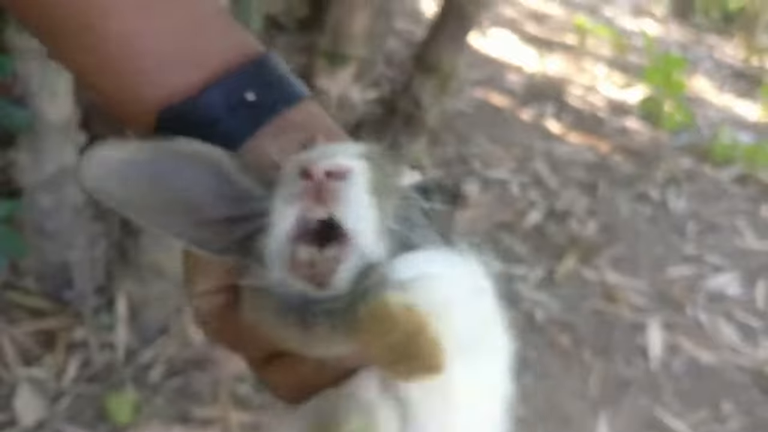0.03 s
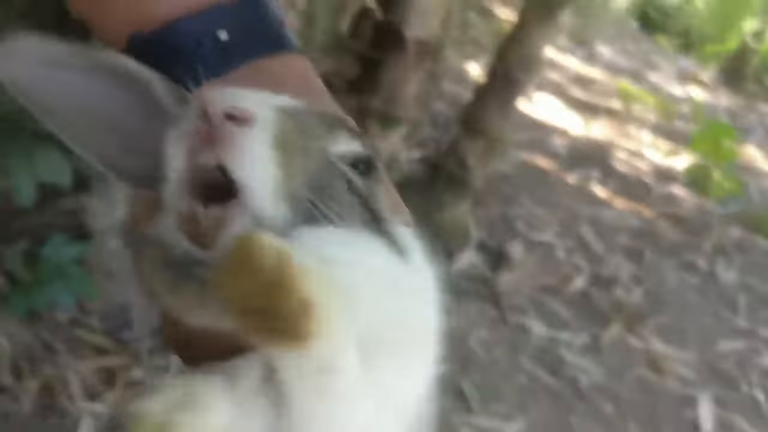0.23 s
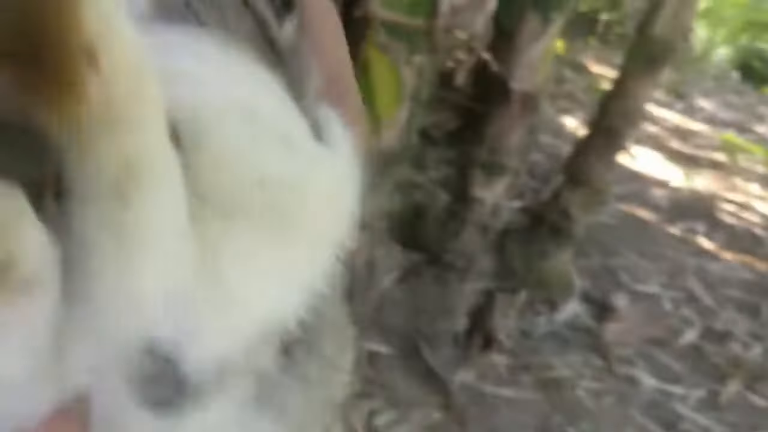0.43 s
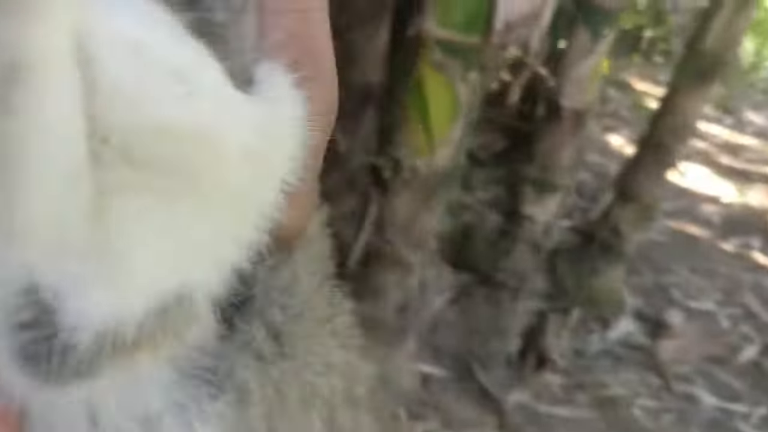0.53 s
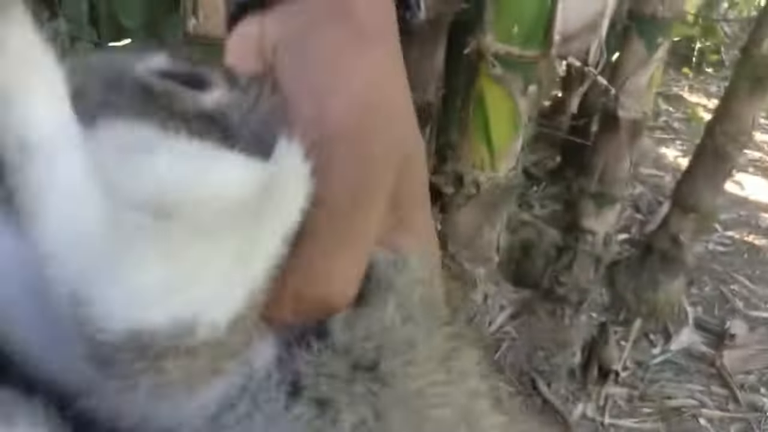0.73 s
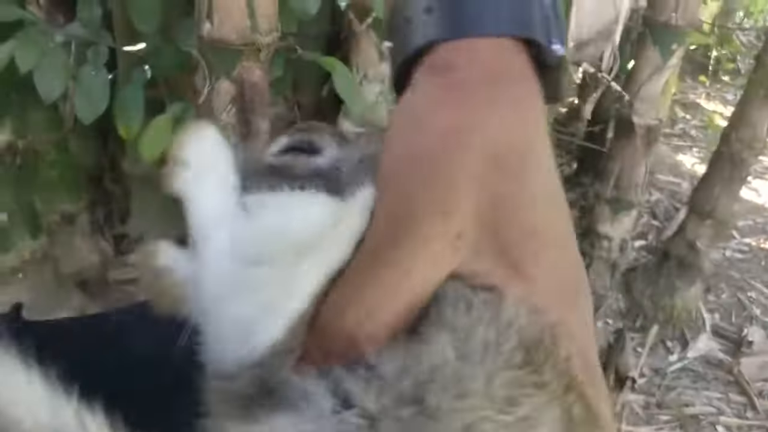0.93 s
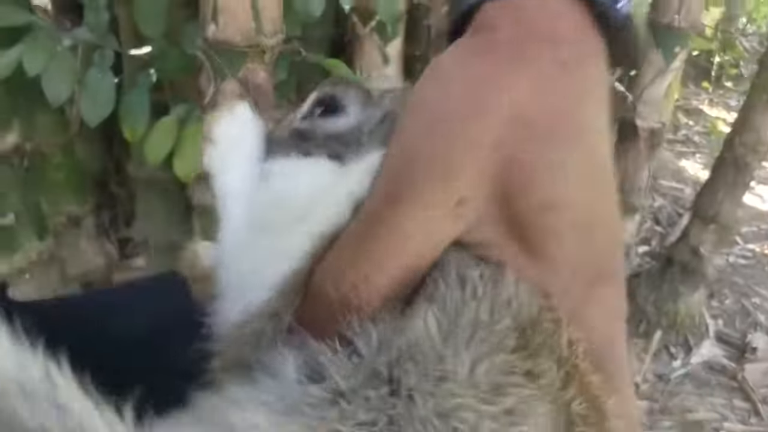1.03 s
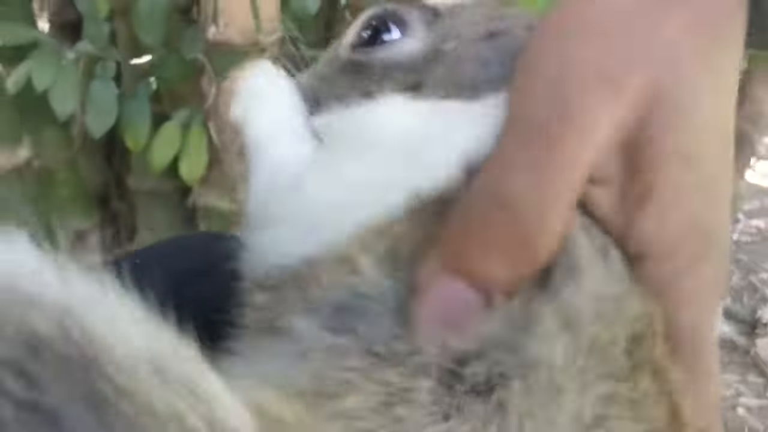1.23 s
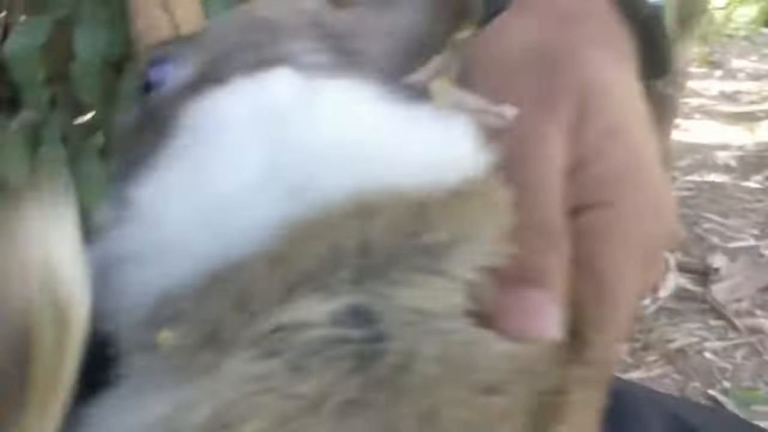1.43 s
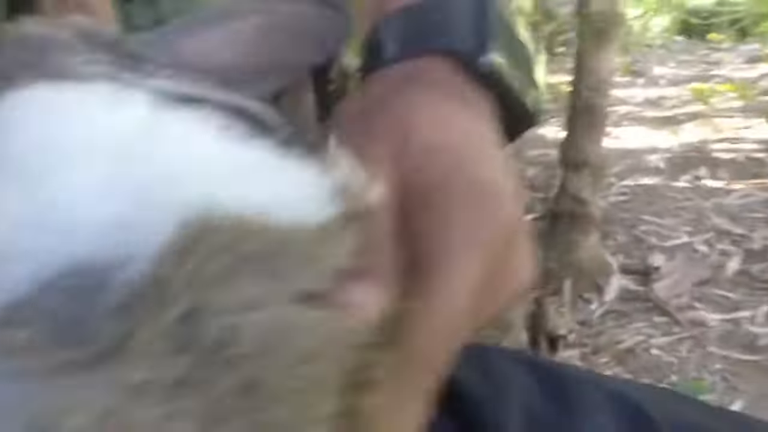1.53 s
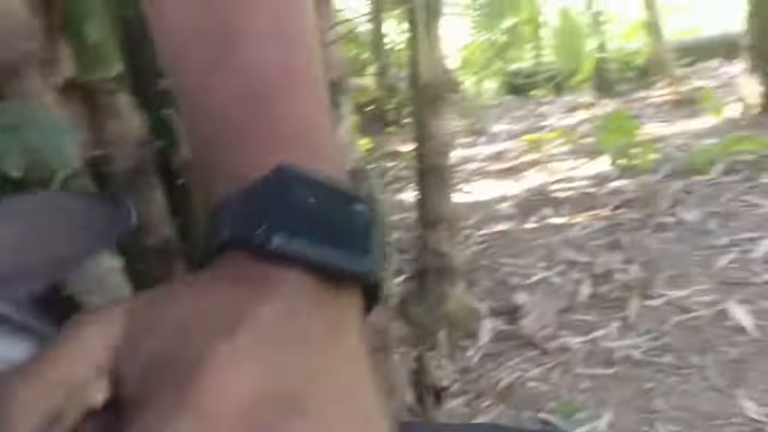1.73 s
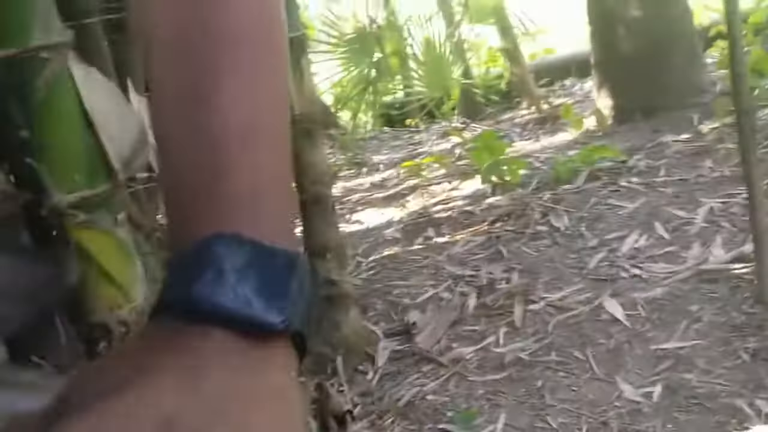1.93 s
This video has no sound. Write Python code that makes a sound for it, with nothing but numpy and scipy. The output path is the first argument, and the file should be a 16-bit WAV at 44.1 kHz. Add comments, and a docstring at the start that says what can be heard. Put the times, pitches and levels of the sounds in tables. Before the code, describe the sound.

A rabbit screams four times, harsh high squeals close up over a low outdoor rumble.

```python
"""Over a low outdoor rumble and small handling bumps, a young rabbit held close to a phone screams four times.
First its vocal folds give a rising squeal, and under strain a second, higher vibration breaks in.
The next cry creaks and shrieks at once, fluttering and chaotic, then fades into air rasping in the throat.
The third is a pressed squeal that gives way to the shriek; the last is only a short, creaking squeal.
After each cry the trees return a faint tail."""
import sys
import numpy as np
from scipy import signal
from scipy.fft import rfft, irfft
from scipy.io import wavfile
from scipy.ndimage import uniform_filter1d, minimum_filter1d, map_coordinates

SR = 44100
rng = np.random.default_rng(int(sys.argv[2]) if len(sys.argv) > 2 else 0)


def bounce(signal):
    """Save signal as a 16-bit WAV file at the path given by the first command-line argument."""
    frames = np.transpose(np.atleast_2d(signal))
    limited = np.clip(frames, -1, 1)
    pcm = np.round(limited * 32767).astype(np.int16)
    wavfile.write(sys.argv[1], SR, pcm)


N = 88200
TIME = np.arange(N) / SR


def undb(db):
    """Amplitude ratio of a level in decibels."""
    return 10 ** (np.asarray(db) / 20)


def unit(x):
    """Normalisation to rms 1."""
    return x / np.sqrt(np.mean(x ** 2))


def gains(spectrum):
    """Magnitude response, interpolated over log frequency."""
    hz, db = np.array(spectrum, float).T
    return undb(np.interp(np.log(np.arange(N // 2 + 1) * SR / N + 1), np.log(hz), db))


def colour(x, spectrum):
    """Zero-phase filtering by a product of spectra."""
    return irfft(rfft(x) * gains(spectrum), N)


def phase_of(hz):
    """Phase is the time integral of frequency."""
    return 2 * np.pi * np.cumsum(hz) / SR


def resonate(hz, width_hz):
    """A resonance driven by noise: a steep band whose centre may move."""
    skirt = signal.butter(4, width_hz / 2, fs=SR, output="sos")
    ring = signal.sosfilt(skirt, rng.standard_normal(N) + 1j * rng.standard_normal(N))
    return unit(np.real(ring * np.exp(1j * phase_of(hz * np.ones(N)))))


def wander(rate_hz):
    """Random modulation: low-pass noise of rms 1."""
    return unit(signal.sosfilt(signal.butter(2, rate_hz, fs=SR, output="sos"), rng.standard_normal(N)))


def controls(table, edge_s=0.00461):
    """Linear interpolation: a gate over the table's span, then each column as a curve."""
    times, *columns = np.array(table, float).T
    gate = np.clip(np.minimum(TIME - times[0], times[-1] - TIME) / edge_s + 1, 0, 1)
    return [gate] + [np.interp(TIME, times, column) for column in columns]


def delayed(x, ms):
    """Propagation delay, which may vary in time."""
    return map_coordinates(x, [np.arange(N) - ms * SR / 1000])


# spectrum of the ambient noise (frequency [Hz], gain [dB])
AMBIENT_SPECTRUM = [(25, -53), (45, -0.5), (87, -3), (300, -14), (750, -16.5), (2110, -22.5), (5430, -36.5),
                    (7920, -51), (16000, -37)]
# its envelope (time [s], level [dB])
AMBIENT_ENVELOPE = [(0, -41.5), (.4, -40.5), (.63, -45), (.9, -36.5), (1.2, -44)]
def rumble(side_db=-9):
    """Partly coherent ambient noise: one part in phase at both microphones, one in antiphase."""
    mid, side = (unit(colour(rng.standard_normal(N), AMBIENT_SPECTRUM)) for _ in range(2))
    _, db = controls(AMBIENT_ENVELOPE)
    return undb(db) * (mid + undb(side_db) * side * np.array([[1], [-1]]))


# bumps and rustles (time [s], centre frequency [Hz], level [dB], decay time [s])
HANDLING_BUMPS = [(0.31, 233, -35.5, 0.0038), (0.693, 94, -32.5, 0.018), (0.944, 83, -34, 0.02),
                  (1.265, 1855, -45, 0.0069)]
def handling():
    """Damped transients: each touch excites a noise band that swells and decays exponentially."""
    bumps = 0
    for start, hz, db, decay in HANDLING_BUMPS:
        age = np.maximum(TIME - start, 0) / decay
        bumps = bumps + undb(db) * age * np.exp(1 - age) * resonate(hz, width_hz=hz)
    return bumps


def reflections(x, db, t60_s):
    """Diffuse reflection: convolution with decaying noise, independent on each side."""
    t = TIME[:N // 4]
    response = rng.standard_normal((2, len(t))) * undb(-60 * t / t60_s) * (t > .001)
    response /= np.sqrt(np.sum(response ** 2, axis=1, keepdims=True))
    return undb(db) * signal.fftconvolve(x[None], response, axes=1)[:, :N]


def arm_echo(x, db=-7, delay_ms=1.121, sway_ms=0.31, sway_hz=3.7):
    """Reflection off the moving arm; added to the direct sound it forms a shifting comb filter."""
    sway = np.sin(2 * np.pi * (sway_hz * TIME + rng.random()))
    return undb(db) * delayed(x, delay_ms + sway_ms * sway)


# treble scattered by fur and hands (frequency [Hz], gain [dB])
FUR_SPECTRUM = [(2500, -24), (5000, -4), (12000, -4)]
# balance of the voice between the microphones (frequency [Hz], left minus right level [dB])
STEREO_BALANCE = [(500, 15.5), (1100, -15), (1650, -9.5), (1870, -21), (2200, 1), (2600, 4), (3400, -2),
                  (5500, 2), (7000, 14.5), (8500, 17.5), (14000, 15)]
def near_paths(voice, right_late_ms=0.327):
    """Interference of direct, reflected and scattered sound, which reaches the left microphone first."""
    near = np.array([x + arm_echo(x) for x in (voice, delayed(voice, right_late_ms))])
    near = near + reflections(colour(voice, FUR_SPECTRUM), db=2, t60_s=0.022)
    ratio = gains(STEREO_BALANCE)
    equal_power_pan = np.array([ratio, np.ones_like(ratio)]) * np.sqrt(2 / (1 + ratio ** 2))
    return irfft(rfft(near) * equal_power_pan, N)


def jaw(start, end, shut=.32, open_s=.04, sag=0.078, close_s=0.031, quiver=.028):
    """Formant scaling: resonances start low, rise as the quivering jaw opens and sink as it closes."""
    opening = shut * np.exp(-np.maximum(TIME - start, 0) / open_s)
    closing = sag * np.exp(-np.maximum(end - TIME, 0) / close_s)
    return 1 - opening - closing + quiver * wander(rate_hz=14)


# resonances of the throat (frequency [Hz], bandwidth [Hz], relative level [dB])
THROAT_FORMANTS = [(838, 670, -11.5), (1864, 525, -3), (2447, 170, -3.5), (3575, 1170, 1)]
# spectrum of the mouth's hiss (frequency [Hz], gain [dB])
HISS_SPECTRUM = [(200, -24.5), (900, -4), (4300, -1.5), (5350, 15), (6500, -4), (8600, -2), (10500, -10),
                 (12500, -3.5), (16000, -10.5)]
# airflow noise, one table per cry (time [s], relative rasp level [dB], relative hiss level [dB])
BREATHS = [
    [(.47, -39, -48), (.49, -22, -37.5), (.53, -42, -31.5), (.56, -26, -36), (.597, -21.5, -41)],
    [(.76, -23, -47), (.79, -31, -37), (.86, -23, -28), (.92, -15, -34), (.98, -18.5, -34),
     (1.06, -14, -38.5), (1.146, -16, -40), (1.158, -25, -58)],
    [(1.39, -60, -46.5), (1.45, -35, -51), (1.475, -43, -68), (1.515, -44, -56), (1.53, -23.5, -43.5),
     (1.595, -21.5, -44), (1.64, -21.5, -38.5), (1.705, -18, -47.5), (1.728, -28.5, -55)],
    [(1.95, -29.5, -59), (2.0, -36, -66)],
]
def air(table, rasp_gain_db=-9, hiss_gain_db=8):
    """Source and filter: turbulence excites throat and mouth, whose resonances follow the jaw."""
    gate, rasp_db, hiss_db = controls(table)
    tuning = jaw(start=table[0][0], end=table[-1][0])
    rasp = unit(sum(undb(db) * resonate(hz * tuning, width) for hz, width, db in THROAT_FORMANTS))
    hiss = unit(colour(rng.standard_normal(N), HISS_SPECTRUM))
    hiss = map_coordinates(hiss, [np.cumsum(tuning)], mode="wrap")  # resampling scales the spectrum
    return gate * (undb(rasp_db + rasp_gain_db) * rasp + undb(hiss_db + hiss_gain_db) * hiss)


# response of the open and of the pressed throat (frequency [Hz], gain [dB])
OPEN_THROAT = [(700, -2.5), (1650, -3), (2300, -8), (3300, -2), (4900, -28.5), (6500, -41.5), (8200, -42),
               (10000, -48)]
PRESSED_THROAT = [(900, 1), (1400, -5), (2150, 5), (2800, -20.5), (3700, -14), (4600, -12), (5550, -14.5),
                  (6500, -32), (15000, -35.5)]
# main vibration of each cry (time [s], pitch [Hz], source level [dB], roughness [0-1])
FIRST_SQUEAL = [(0.126, 1253, -32.5, 0.01), (.15, 1500, -25, 0.13), (0.181, 1609, -23.5, 0.11),
                (0.239, 1657, -24, 0.11), (0.273, 1562, -23, 0), (0.307, 1505, -24, 0.13),
                (.356, 1693, -16, 0.1), (.405, 1627, -20.5, 0.1), (0.437, 1667, -19.5, 0.01),
                (.452, 1588, -23.5, 0.1), (0.477, 1636, -25, 0.1), (0.49, 1800, -19, 0.03),
                (0.512, 1596, -35.5, 0.54), (0.588, 1400, -30.5, 0.2), (.602, 1139, -29, 0.2)]
SECOND_SQUEAL = [(0.763, 940, -35.5, 0.58), (.79, 1176, -24.5, 0.85), (.855, 1720, -17.5, 0.26),
                 (0.903, 1800, -45, 0.36), (0.939, 1600, -26, 0.16), (.98, 1537, -29.5, 0.173),
                 (1.051, 1500, -27, 0.13), (1.095, 1490, -35, 0.2), (1.136, 1300, -38, 0.26),
                 (1.138, 800, -37.5, 0.18), (1.158, 700, -41.5, 0.24)]
THIRD_SQUEAL = [(1.391, 618, -36.5, 0.73), (1.412, 1516, -23.5, 0.51), (1.434, 1850, -21.5, .9),
                (1.456, 1946, -18, 0.833), (1.463, 1855, -18.5, 0.048), (1.505, 1841, -18.5, 0.041),
                (1.523, 1867, -19, 0.023)]
FOURTH_SQUEAL = [(1.950, 1000, -32, .1), (1.958, 1540, -26.5, .1), (1.969, 1852, -25, 0.56),
                 (2.0, 1931, -28.5, 0.964)]
def squeal(table, throat, creak_hz, creak_swing=.3, jitter=0.0599, shimmer=0.15):
    """Harmonic vibration of the vocal folds, creaking when rough. Returns sound and phase."""
    gate, hz, db, rough = controls(table)
    # in a creak the pitch climbs and slips back
    creak = signal.sawtooth(phase_of(creak_hz * (1 + .2 * wander(rate_hz=creak_hz))))
    waver = .002 * wander(rate_hz=112)
    rough_bend = rough * (creak_swing * rough * creak + jitter * wander(rate_hz=569))
    phase = phase_of(hz * (1 + waver + rough_bend))
    tone = np.sqrt(2) * colour(sum(np.sin(k * phase) for k in range(1, 9)), throat)
    spread = shimmer * rough
    flicker = np.exp(spread * wander(rate_hz=390) - spread ** 2)
    return gate * undb(db) * tone * flicker, phase


# filter that colours the shriek (frequency [Hz], gain [dB])
SHRIEK_SPECTRUM = [(300, -14), (900, 0.5), (1400, -1.5), (1800, 2.5), (2400, 2), (3600, 2.5), (4600, 9.5),
                   (7000, -10.5)]
# higher vibration (time [s], pitch [Hz], source level [dB], roughness [0-1], flutter rate [Hz])
FIRST_SHRIEK = [(.45, 3150, -26, 0, 600), (.472, 3260, -18, .02, 600), (.485, 3400, -12, .55, 380),
                (.503, 3060, -12.5, .55, 770), (.526, 3070, -13.5, .65, 770), (.545, 3170, -13, .55, 300),
                (.565, 2960, -18, .2, 450), (.586, 2760, -21, .14, 700), (.6, 2350, -25, .08, 900)]
SECOND_SHRIEK = [(.765, 1120, -24, .5, 500), (.782, 1427, -17, .6, 500), (.8, 1867, -17, .35, 440),
                 (.83, 2190, -9, .7, 325), (.851, 2300, -7, .55, 340), (.885, 2480, -11.5, .45, 500),
                 (.924, 2570, -13, .45, 740), (.943, 2511, -20, .2, 850), (.99, 2397, -36.5, .5, 850),
                 (1.043, 2540, -26, .35, 900), (1.101, 2500, -28, .6, 900), (1.152, 2339, -31, .9, 800)]
THIRD_SHRIEK = [(1.525, 2030, -17, .3, 170), (1.537, 2150, -14, .1, 420), (1.55, 2160, -13.5, .1, 420),
                (1.558, 2190, -14.5, .6, 260), (1.569, 2230, -14, .13, 450), (1.593, 2290, -14, .18, 480),
                (1.605, 2250, -16, .8, 420), (1.625, 2430, -16.5, 1, 400), (1.655, 2350, -18.5, .9, 350),
                (1.675, 2170, -16, .25, 480), (1.689, 2400, -17, .12, 780), (1.71, 2200, -21, .8, 600),
                (1.732, 2200, -39, .45, 300)]
def shriek(table, squeal_phase, jitter=0.1104, shimmer=0.23, octave_db=-30.5, hum_db=-29.5,
           flutter_onset=.12, flutter_depth=0.45, flutter_swing_rad=0.41):
    """Biphonation: a second, higher vibration, modulated in amplitude and phase under strain."""
    gate, hz, db, rough, flutter_hz = controls(table)
    flutter_phase = phase_of(flutter_hz * (1 + .36 * rough * wander(rate_hz=263)))
    strain = np.tanh(rough / flutter_onset)
    flutter = strain * np.sin(flutter_phase)
    phase = phase_of(hz * (1 + jitter * rough * wander(rate_hz=620))) - flutter_swing_rad * flutter
    phase += (2 * squeal_phase - phase)[np.argmax(gate)]  # sets out in step with the squeal's octave
    amplitude = np.exp(flutter_depth * (1 + rough) * flutter)
    amplitude *= 1 + shimmer * rough * wander(rate_hz=790)
    tone = np.tanh(amplitude / 2) * (np.sin(phase) + undb(octave_db) * np.sin(2 * phase))
    hum = undb(hum_db) * (np.sin(flutter_phase) + np.sin(2 * flutter_phase))
    return gate * undb(db) * (colour(unit(tone), SHRIEK_SPECTRUM) + hum)


def cry(squeal_table, throat, breath, shriek_table=None, *, creak_hz):
    """Superposition of squeal, turbulent air and, if given, a shriek."""
    tone, phase = squeal(squeal_table, throat, creak_hz)
    return tone + air(breath) + (shriek(shriek_table, phase) if shriek_table else 0)


def scene(lean_db=2.5):
    """Multipath propagation: four cries arrive directly and off trees, over a left-leaning background."""
    voice = (cry(FIRST_SQUEAL, OPEN_THROAT, BREATHS[0], FIRST_SHRIEK, creak_hz=420)
             + cry(SECOND_SQUEAL, OPEN_THROAT, BREATHS[1], SECOND_SHRIEK, creak_hz=380)
             + cry(THIRD_SQUEAL, PRESSED_THROAT, BREATHS[2], THIRD_SHRIEK, creak_hz=200)
             + cry(FOURTH_SQUEAL, PRESSED_THROAT, BREATHS[3], creak_hz=100))
    near = near_paths(voice)
    trees = reflections(voice, db=-14, t60_s=0.14)
    background = (rumble() + handling()) * undb([[lean_db / 2], [-lean_db / 2]])
    return background + trees + near


def record(dry, low_hz=34, top_hz=16300, ceiling=.98):
    """Band and peak limiting: the phone drops the deepest rumble, holds down peaks and cuts the top."""
    dry = signal.sosfilt(signal.butter(4, low_hz, "high", fs=SR, output="sos"), dry)
    headroom = ceiling / np.maximum(np.abs(dry).max(axis=0), ceiling)
    gain = uniform_filter1d(minimum_filter1d(headroom, size=129), size=129)
    return signal.sosfilt(signal.ellip(10, .1, 80, top_hz, fs=SR, output="sos"), dry * gain)


dry = scene()
out = record(dry)
bounce(out)
```